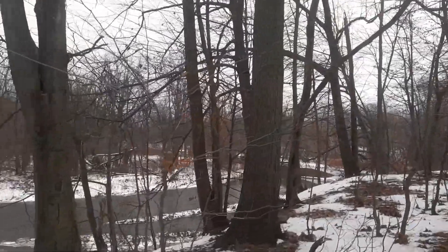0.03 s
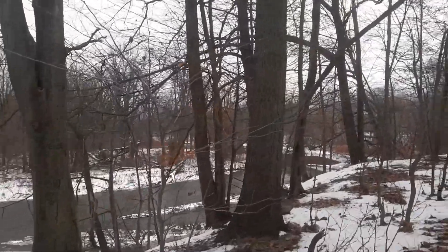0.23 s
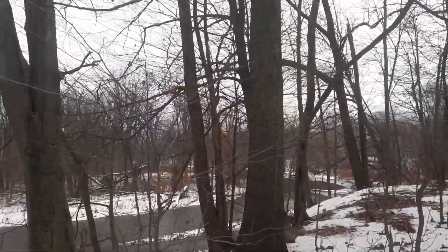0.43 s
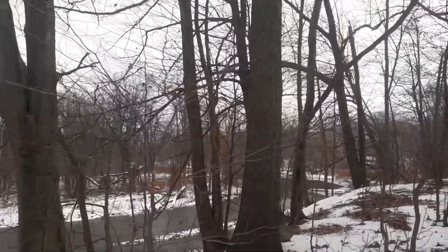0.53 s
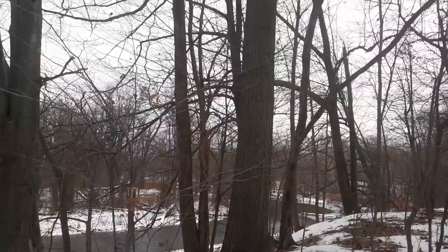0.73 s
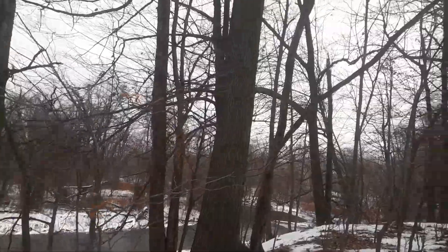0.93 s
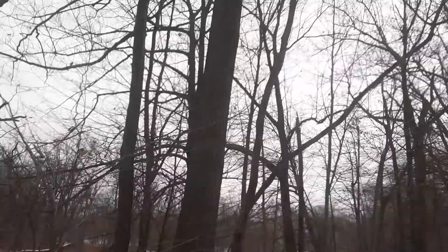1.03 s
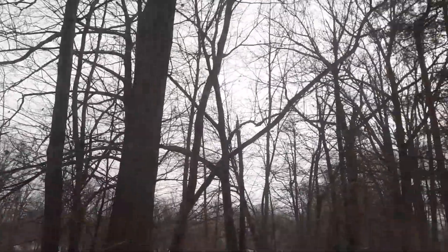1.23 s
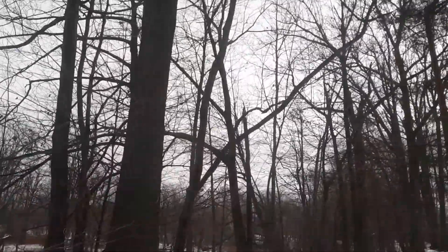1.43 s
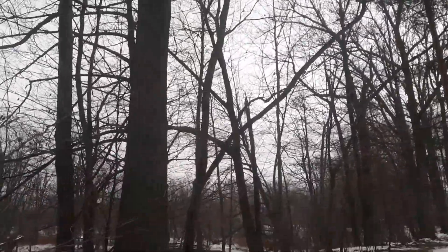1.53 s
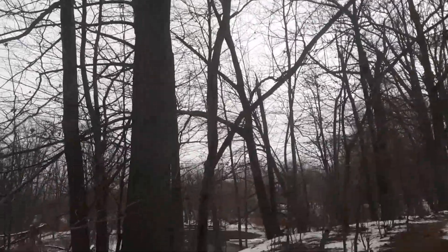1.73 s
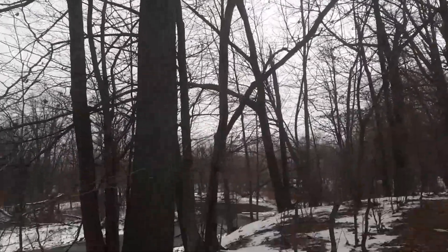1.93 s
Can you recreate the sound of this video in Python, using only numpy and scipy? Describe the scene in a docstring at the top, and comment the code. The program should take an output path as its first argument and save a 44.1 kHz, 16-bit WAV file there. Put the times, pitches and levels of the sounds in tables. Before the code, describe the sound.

Two slow footsteps crunch on crusted snow and dead leaves, close and mostly on the right. After light rustling, the first lands at about 0.4 seconds, crackling until 0.8. A sharp tap on the microphone's case hits both sides at 1.0. The second step starts near 1.3, with a soft thud and twig snaps around 1.6 to 1.7, then fades. Faint woodland air continues throughout.

```python
"""A quiet wood: two slow steps crunch through crusted snow and dead leaves, and twigs snap under the boot.
Each crunch is a swarm of tiny fractures; larger pieces crack and ring, and the ground thuds softly.
The right microphone is open to the steps and the faint rush of the air. The left one, under the hand,
gets hiss and small slips of the fingers right at its port. Between the steps, one sharp tap on the
case reaches both microphones."""
import sys
import numpy as np
from scipy import signal
from scipy.fft import rfft, irfft, next_fast_len
from scipy.io import wavfile

SR = 44100
rng = np.random.default_rng(int(sys.argv[2]) if len(sys.argv) > 2 else 0)


def unload_audio(sound):
    """Save the sound as a 16-bit wav file, at the path given as the first command line argument."""
    columns = np.transpose(np.atleast_2d(sound))
    # keep every value between -1 and 1, then stretch to whole-number steps
    steps = np.round(np.clip(columns, -1, 1) * 32767)
    wavfile.write(sys.argv[1], SR, steps.astype(np.int16))


N = 88200

# Shifts of weight underfoot. Each row: start, attack, hold and release (per 20 dB) in seconds,
# level, packed-snow body and leaf fizz in dB, pitch of the bite in Hz, its boost in dB.
CRUNCHES = [ (.015, .02, .025, .05, -49.5, -8, -4, 4400, 2), (.130, .04, .03, .05, -50.5, -6, -7, 4400, 0),
            (.203, .006, .032, .04, -44.5, -8, -3, 4400, 2), (.345, .060, .020, .03, -48, 1, -10, 5300, 0),
            (.408, .012, .010, .03, -42, -4, -2, 5400, 4), (.426, .004, .055, .07, -31, -2.5, 2, 5350, 6),
            (.470, .035, .090, .19, -33.5, 1, 1, 6800, 4), (.482, .010, .016, .018, -31.8, 0, 0, 4650, 6),
            (.560, .027, .006, .11, -33.3, -2, -6, 3850, 3), (.615, .030, .025, .09, -38.5, 4, -4, 3900, 3),
            (.690, .012, .040, .06, -43.5, -1, -2, 5700, 3), (.808, .010, .008, .05, -49, 3, -5, 4000, 2),
            (1.245, .012, .018, .02, -49, -6, -10, 5800, 2),
            (1.273, .003, .021, .025, -32.2, -1, -13, 5900, 5),
            (1.303, .012, .012, .16, -35.7, -2, -3, 5600, 3),
            (1.355, .010, .007, .05, -36.5, -5, -2, 4150, 3),
            (1.385, .045, .055, .10, -41.3, 2, -1, 2800, 4),
            (1.485, .028, .040, .12, -36.5, 4.5, -3, 6400, 2),
            (1.598, .006, .032, .13, -37.5, 3.5, -4, 4100, 2),
            (1.712, .008, .015, .20, -47, 3, -5, 4000, 1), (1.835, .015, .035, .30, -52.3, 2, -7, 4100, 1)]
# Single breaks of crust and twigs. Each row: start in seconds, level and low body in dB, low cut in Hz,
# ring pitch in Hz, ring against crack in dB, ring t60 in seconds.
SNAPS = [ (.4295, -31.5, -6, 900, 5350, 0, .03), (.445, -35, -6, 900, 5800, -3, .012),
         (.467, -31.5, -4, 700, 5300, -1, .025), (.4995, -32, 7, 300, 4400, -8, .014),
         (.5405, -38, 6, 700, 1400, -1, .02), (.5905, -31.7, -4, 700, 3760, -1, .035),
         (.606, -37, 7, 400, 1500, -8, .014), (.667, -37.5, 11, 400, 1550, -3, .018),
         (.693, -36.5, 3, 700, 5500, -3, .014), (.709, -36, 7, 450, 3900, -8, .014),
         (.744, -41, 0, 700, 5500, -6, .014), (1.2765, -30.3, -1, 1000, 5900, -6, .02),
         (1.2872, -31.5, -1, 1000, 4400, -8, .014), (1.2955, -33.5, 3, 900, 5900, -6, .014),
         (1.306, -35, -1, 700, 5600, -8, .014), (1.3145, -37, -4, 900, 5700, 1, .025),
         (1.594, -43, 12, 400, 800, 0, .018), (1.6047, -28, 5, 1300, 1905, -5, .11),
         (1.6125, -37, 4, 900, 1400, -1, .025), (1.6944, -31.6, 7, 800, 2050, -6, .011),
         (1.7083, -34.2, 6, 350, 1400, -10, .008), (1.7618, -41.5, 5, 1200, 2000, -2, .016),
         (1.8825, -47.5, 0, 900, 4100, -3, .014)]
# The boot's weight on the ground. Each row: start in seconds, pitch in Hz, level in dB, t60 in seconds.
THUDS = [(.500, 265, -29, .045), (.516, 235, -32, .045), (1.395, 125, -23, .035)]
# Knocks on the case. Each row: start in seconds, strength in dB.
TAPS = [(1.0262, -26), (1.0350, 0)]
# The hollow ring of the case. In order: pitch in Hz, left and right gain in dB, t60 and delay in seconds.
CASE_MODE = (540, -17.2, -46, .024, .0012)
# Fingers slipping on the case. Each row: start in seconds, level in dB.
SLIPS = [(.309, -52), (.457, -52), (.476, -52), (.488, -50), (.502, -48), (.516, -47), (1.036, -51)]
# Skin rubbing by the left port. Each row: start, attack, hold and release in seconds, level in dB.
RUBS = [(.41, .07, .04, .06, -71), (.968, .018, .04, .09, -62), (1.024, .012, .008, .028, -47.5)]
# Tone colours. Each row: frequency in Hz, relative level in dB.
CRUNCH_COLOUR = [(60, -35), (250, -17), (900, -10), (1400, -7.5), (1900, -8.5), (2300, -16), (2650, -20),
                 (3200, -6.5), (3750, 0), (4700, -5.5), (5400, -2.5), (6750, -10), (7600, -25), (9200, -19),
                 (10000, -25), (10900, -15.5), (11700, -13), (12700, -18), (15500, -21.5)]  # a break as the open microphone hears it
CRUST_COLOUR = [(1100, -1), (2600, 3), (3800, -1), (4700, 2), (5800, 2), (6600, -4), (8000, 2), (10000, 5),
                (11000, -4.5), (13000, 1), (15500, 4)]  # added to that for the second step
LEFT_CLICK_COLOUR = [(30, -40), (110, -21), (250, -24), (950, -14), (1200, -2), (1750, -13), (2100, -6),
                     (2900, -7), (3900, 1), (4700, -9), (5600, -20), (7500, -29), (10000, -18),
                     (13000, -25), (15300, -21)]
RIGHT_CLICK_COLOUR = [(30, -20), (600, -3), (1400, -6), (1900, -1), (2900, -12), (4300, 0), (5400, -10),
                      (6500, -3), (7500, -13), (9500, -31), (14000, -23)]
SKIN_COLOUR = [(100, -8), (500, -5), (750, -14), (1050, -7), (2600, -19), (3400, -13), (4200, 0),
               (5500, -15), (7500, -23), (10000, -12), (15000, -18)]
AIR_COLOUR = [(20, -28), (35, -13), (55, -3), (110, 1.5), (200, -5), (320, -8), (650, -6), (1200, -5),
              (1700, -9), (2300, -17), (4000, -14.5), (6100, -17), (6800, -25), (7700, -39), (11000, -36),
              (15000, -37)]
HISS_COLOUR = [(20, -18), (55, -3), (110, 1), (300, -13), (2000, -19), (7500, -22), (15000, -17)]

SECOND_STEP_S = 1.2
AIR_DB, HISS_DB, HAND_LEAK_DB = -48.5, -72, -58


def crunches(bite_width_hz=380):
    """Each shift of weight breaks a swarm of ice grains and leaves; their size pitches its bite."""
    out, t = np.zeros(N + SR), np.arange(SR // 2) / SR
    for start, attack, hold, release, db, body_db, fizz_db, bite_hz, bite_db in CRUNCHES:
        swarm = coloured(fractures(len(t)), lambda hz: bite_db * bell(hz, bite_hz, bite_width_hz))
        grit_db = .35 * (-31 - db)  # the lighter the tread, the coarser the grit
        swarm = break_tone(swarm, start, body_db, grit_db, fizz_db)
        out[int(start * SR):][:len(t)] += amp(db) * swell(t, attack, hold, release) * unit(swarm)
    return out[:N]


def fractures(size, grains_per_s=3200, grain_s=.00025, spread_db=3.7, smooth_power=.55):
    """Grains break in a dense stream of tiny, uneven bursts over smooth noise; rms 1."""
    breaks = rng.random(size) < grains_per_s / SR
    strength = amp(spread_db * np.clip(rng.standard_normal(size), -2.5, 2.5))
    power = signal.lfilter([1], [1, -np.exp(-1 / (grain_s * SR))], breaks * strength ** 2)
    return unit(np.sqrt(power / power.mean() + smooth_power) * rng.standard_normal(size))


def break_tone(x, start, body_db, grit_db, fizz_db):
    """The tone of a break as the open microphone hears it, with more or less body, grit and fizz."""
    def colour_db(hz):
        base = along(CRUNCH_COLOUR, hz) + (start > SECOND_STEP_S) * along(CRUST_COLOUR, hz)
        body = body_db * low_shelf(hz, edge_hz=2700)
        grit = grit_db * bell(hz, centre_hz=2450, width_hz=500)
        fizz = fizz_db * (1 - low_shelf(hz, edge_hz=7500))
        return base + body + grit + fizz
    return coloured(x, colour_db)


def snaps(ring_width_hz=12, level_window_s=.005):
    """A larger piece breaks with a crack and a brief, unsteady ring; thin pieces have no bass."""
    out, t = np.zeros(N + SR), np.arange(SR // 16) / SR
    for start, db, body_db, low_hz, ring_hz, ring_db, t60 in SNAPS:
        burst = rng.standard_normal(len(t)) * fade(t, t60=.009)
        crack = low_cut(break_tone(burst, start, body_db, grit_db=1, fizz_db=-7), low_hz)
        phase_drift = np.cumsum(rng.standard_normal(len(t))) * np.sqrt(2 * np.pi * ring_width_hz / SR)
        ringing = np.sin(2 * np.pi * ring_hz * t + phase_drift) * fade(t, t60)
        snap = unit(crack) + amp(ring_db) * unit(ringing)
        out[round(start * SR):][:len(t)] += amp(db) * unit(snap) * np.sqrt(level_window_s / t[-1])
    return out[:N]


def thuds(attack_s=.004):
    """The snow gives way and the boot meets the ground."""
    return sum(amp(db) * ring(since(start), hz, t60) * (1 - np.exp(-since(start) / attack_s))
               for start, hz, db, t60 in THUDS)


def taps(left_click_db=-3.3, right_click_db=-15.5):
    """A light touch, then a sharp tap: a click at each port and the hollow ring of the case."""
    blows = np.bincount([round(start * SR) for start, db in TAPS], [amp(db) for start, db in TAPS], N)
    left = amp(left_click_db) * coloured(blows, lambda hz: along(LEFT_CLICK_COLOUR, hz))
    right = amp(right_click_db) * coloured(blows, lambda hz: along(RIGHT_CLICK_COLOUR, hz))
    case_hz, left_db, right_db, t60, delay = CASE_MODE
    hollow = sum(amp(db) * ring(since(start + delay), case_hz, t60) for start, db in TAPS)
    return np.array([left, right]) + amp([[left_db], [right_db]]) * low_cut(hollow, hz=400)


def fingers(push_s=.0009, return_s=.003, ring_db=-11):
    """Right at the covered port, slips make soft pressure bumps that ring the case, and skin rubs."""
    case_hz, _, _, t60, _ = CASE_MODE
    slips = np.zeros(N)
    for start, db in SLIPS:
        t = since(start)
        pressure = bump(t / push_s) - push_s / return_s * bump(t / return_s)
        slips += amp(db) * (pressure + amp(ring_db) * ring(t, case_hz, t60))
    rubbing = sum(amp(db) * swell(since(start), attack, hold, release)
                  for start, attack, hold, release, db in RUBS)
    return slips + rubbing * noise(SKIN_COLOUR)


def noise(colour):
    """The steady rush of air, skin or microphone hiss in the given colour; rms 1."""
    return unit(coloured(rng.standard_normal(N), lambda hz: along(colour, hz)))


def coloured(x, db_at):
    """Causal filter of unit power gain, shaped by a dB function of frequency."""
    size = 2 * next_fast_len(len(x) // 2 + 2048)
    gain = unit(amp(db_at(np.fft.rfftfreq(size, 1 / SR))))
    cepstrum = irfft(np.log(gain + 1e-9), size)
    fold = np.r_[1, np.full(size // 2 - 1, 2), 1, np.zeros(size // 2 - 1)]  # gives minimum phase
    return irfft(rfft(x, size) * np.exp(rfft(cepstrum * fold)), size)[:len(x)]


def along(colour, hz):
    """A colour's level in dB at hz, interpolated on a log axis."""
    points_hz, points_db = np.transpose(colour)
    return np.interp(np.log(hz + 1), np.log(points_hz + 1), points_db)


def bell(hz, centre_hz, width_hz):
    """Gaussian band of height 1."""
    return np.exp(-((hz - centre_hz) / width_hz) ** 2)


def low_shelf(hz, edge_hz):
    """One well below the edge, zero well above it."""
    return 1 / (1 + (hz / edge_hz) ** 8)


def low_cut(x, hz):
    """Second-order high-pass."""
    return signal.sosfilt(signal.butter(2, hz, "high", fs=SR, output="sos"), x)


def swell(t, attack, hold, release):
    """Straight rise, hold, and a fall of 20 dB per release time."""
    return np.minimum(t / attack, 1) * amp(-20 * np.maximum(t - attack - hold, 0) / release)


def bump(u):
    """Soft pulse that peaks at u = 1."""
    return u * np.exp(1 - u)


def ring(t, hz, t60):
    """One damped mode."""
    return np.sin(2 * np.pi * hz * t) * fade(t, t60)


def fade(t, t60):
    """Exponential decay, 60 dB in t60."""
    return np.exp(-np.log(1000) * t / t60)


def since(start):
    """Seconds since start, zero before it."""
    return np.maximum(np.arange(N) / SR - start, 0)


def amp(db):
    """Decibels to gain."""
    return 10 ** (np.asarray(db) / 20)


def unit(x):
    """Scale to rms 1."""
    return x / np.sqrt(np.mean(x ** 2) + 1e-20)


def scene():
    """Left microphone under the hand, right microphone open to the wood, the tap on both."""
    wood = crunches() + snaps() + thuds() + amp(AIR_DB) * noise(AIR_COLOUR)
    covered = fingers() + amp(HISS_DB) * noise(HISS_COLOUR) + amp(HAND_LEAK_DB) * wood
    return np.array([covered, wood]) + taps()


def record(dry):
    """The camera keeps nothing above its band limit."""
    size, top_hz = next_fast_len(N + SR // 2), 15900
    passband = np.fft.rfftfreq(size, 1 / SR) < top_hz
    return irfft(rfft(dry, size) * passband, size)[:, :N]


dry = scene()
out = record(dry)
unload_audio(out)
```